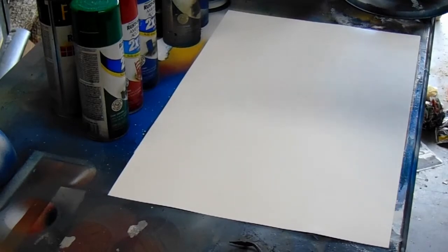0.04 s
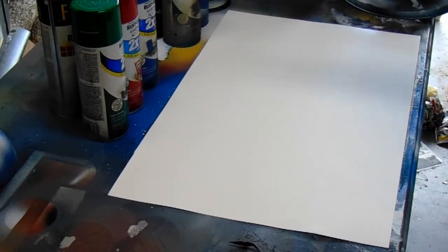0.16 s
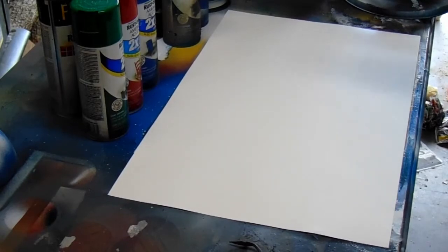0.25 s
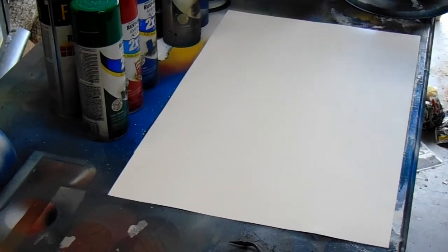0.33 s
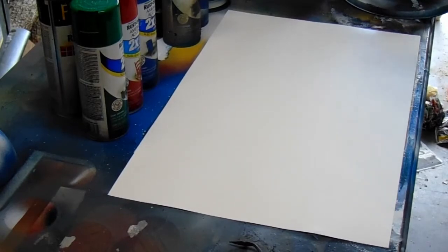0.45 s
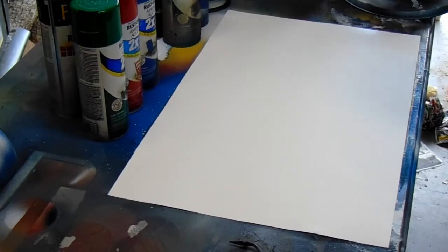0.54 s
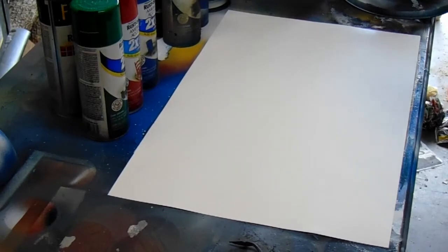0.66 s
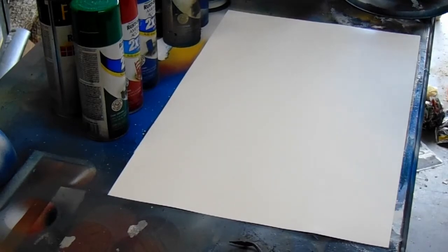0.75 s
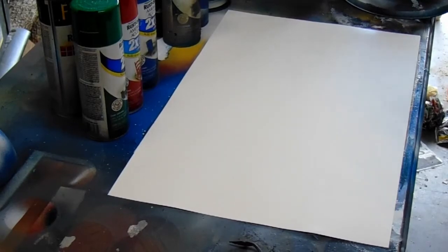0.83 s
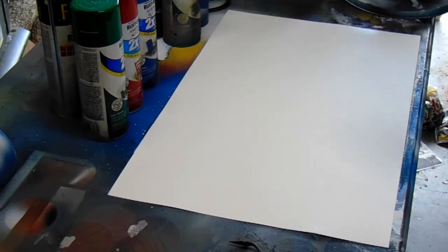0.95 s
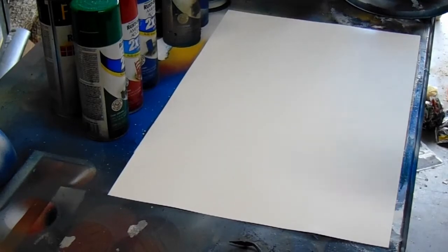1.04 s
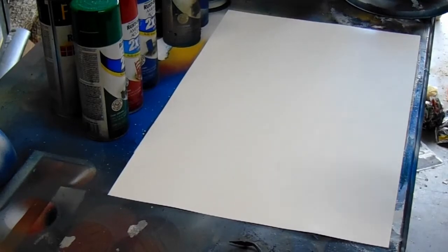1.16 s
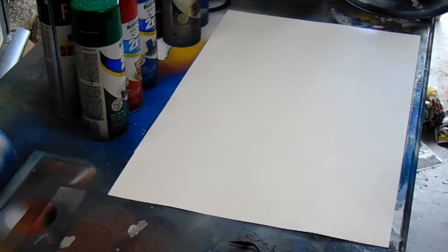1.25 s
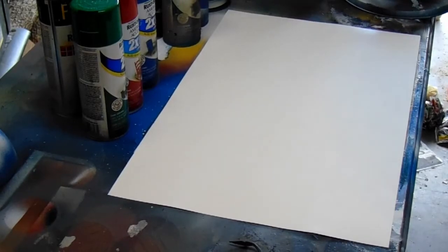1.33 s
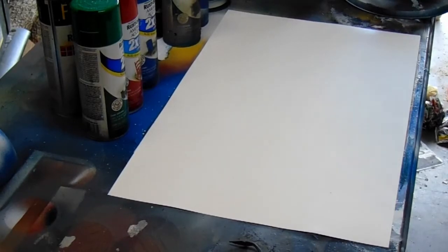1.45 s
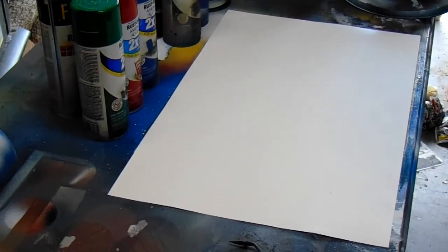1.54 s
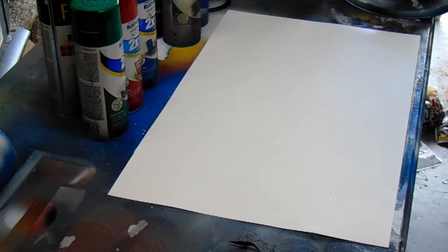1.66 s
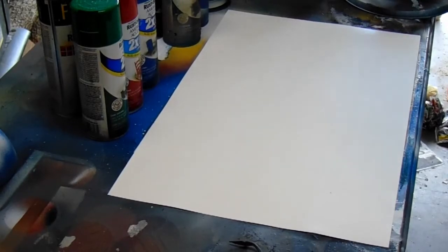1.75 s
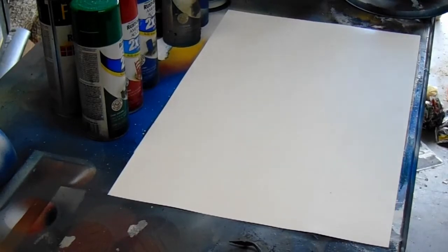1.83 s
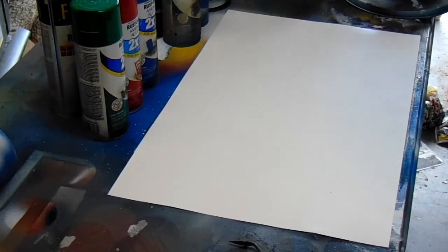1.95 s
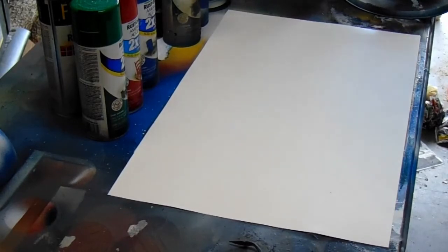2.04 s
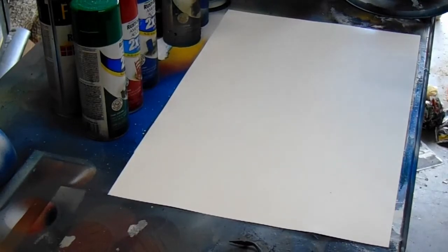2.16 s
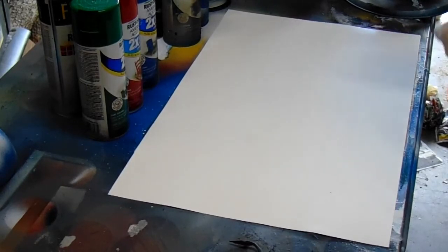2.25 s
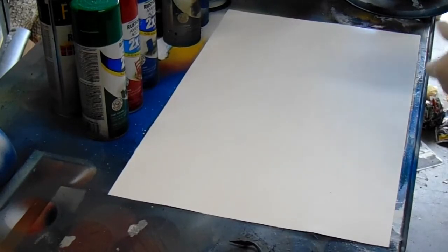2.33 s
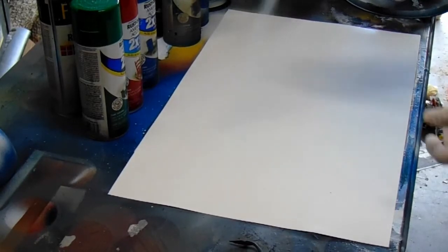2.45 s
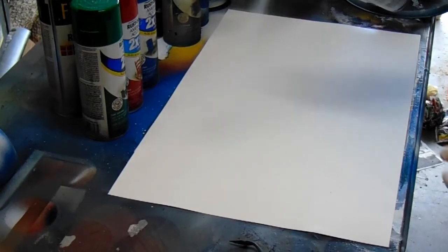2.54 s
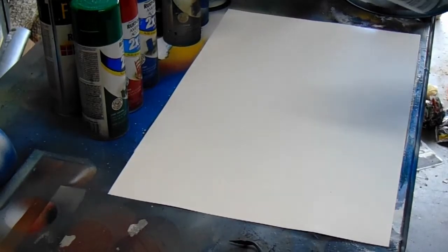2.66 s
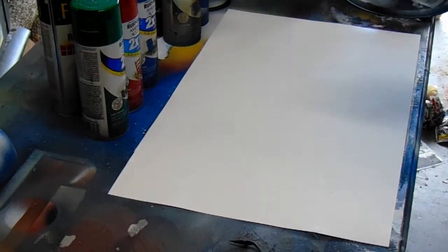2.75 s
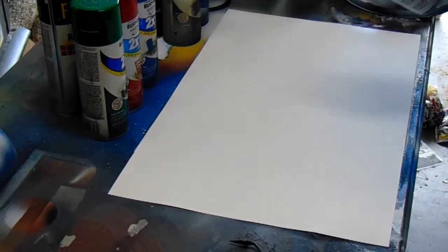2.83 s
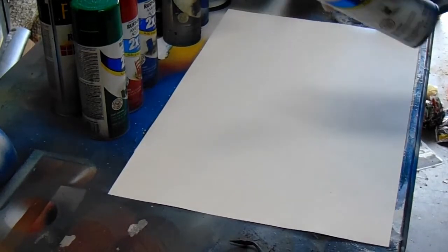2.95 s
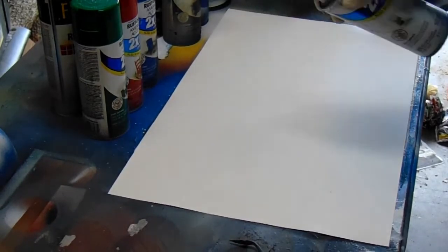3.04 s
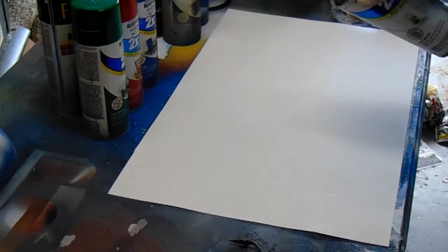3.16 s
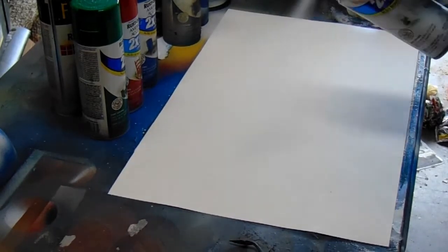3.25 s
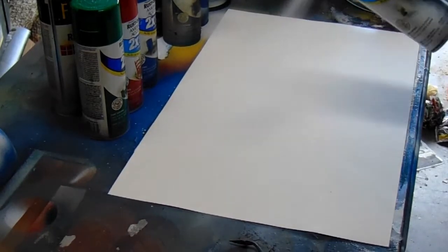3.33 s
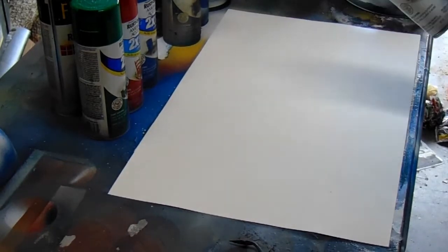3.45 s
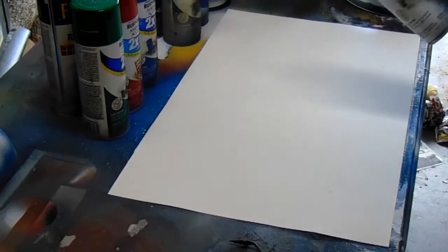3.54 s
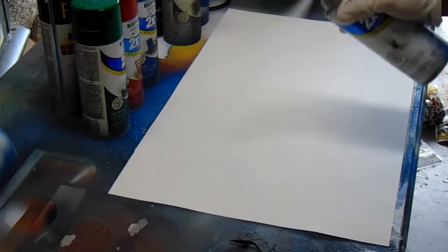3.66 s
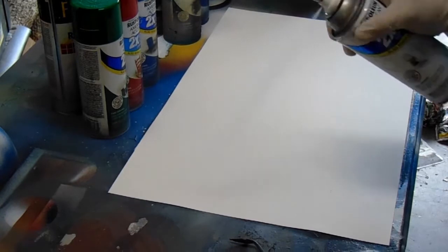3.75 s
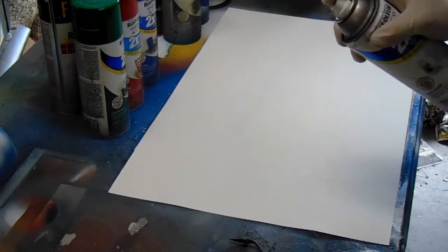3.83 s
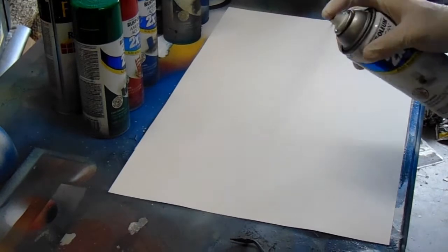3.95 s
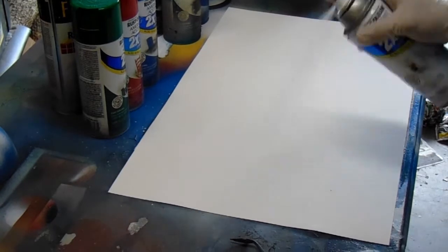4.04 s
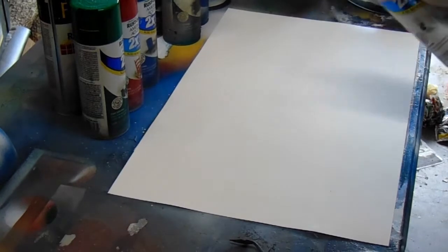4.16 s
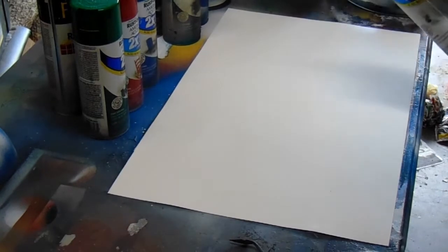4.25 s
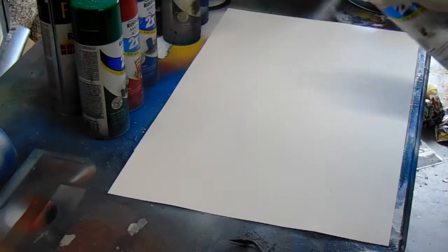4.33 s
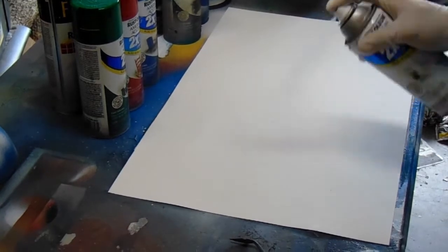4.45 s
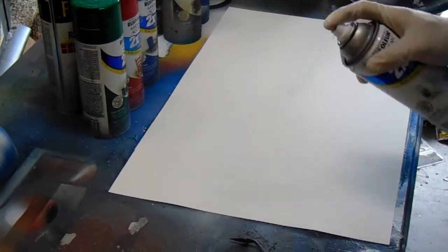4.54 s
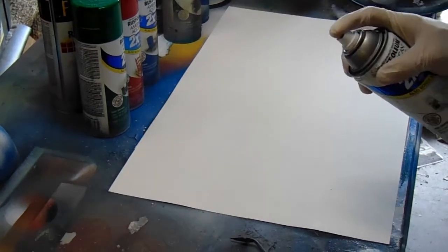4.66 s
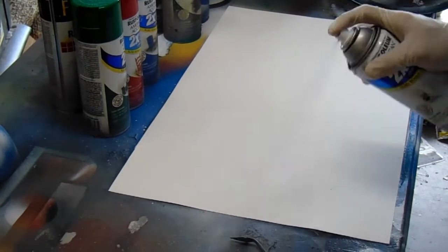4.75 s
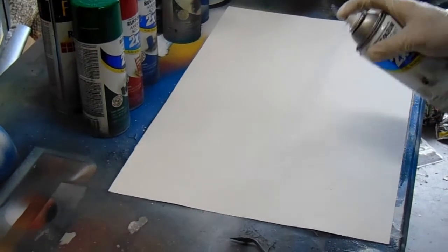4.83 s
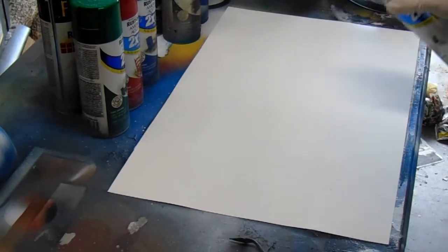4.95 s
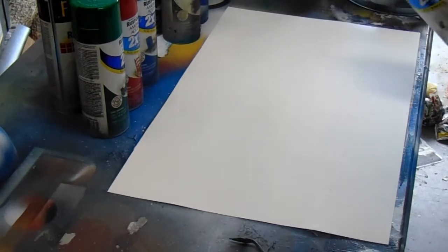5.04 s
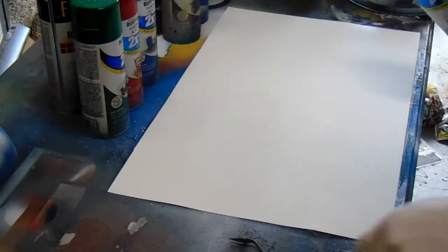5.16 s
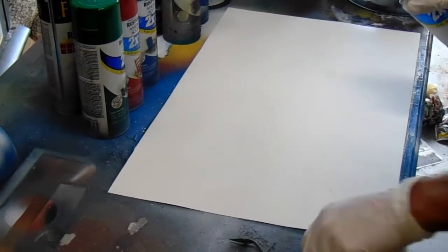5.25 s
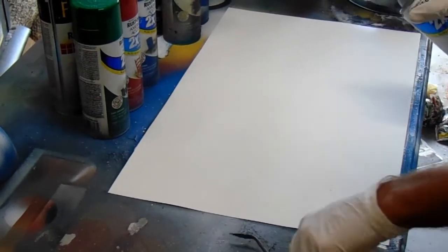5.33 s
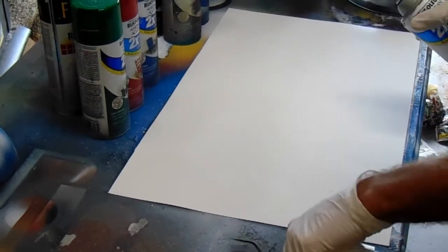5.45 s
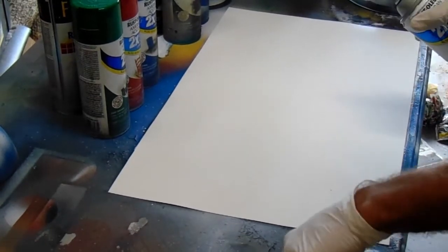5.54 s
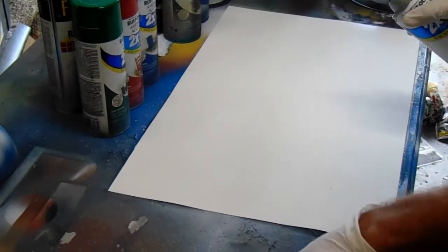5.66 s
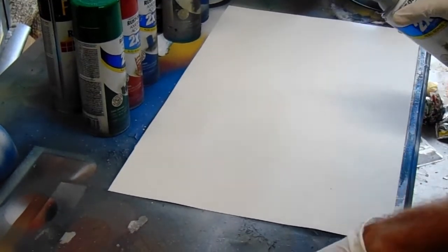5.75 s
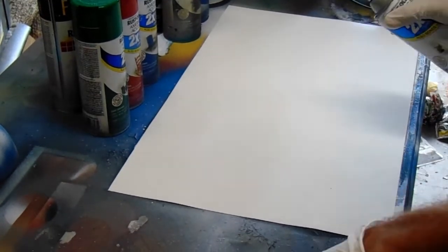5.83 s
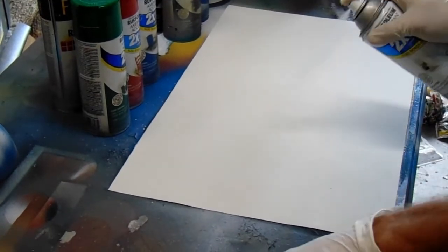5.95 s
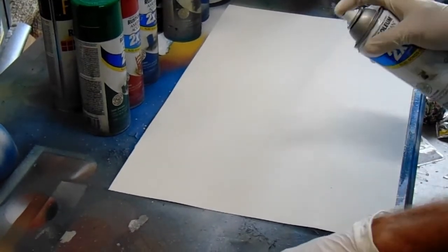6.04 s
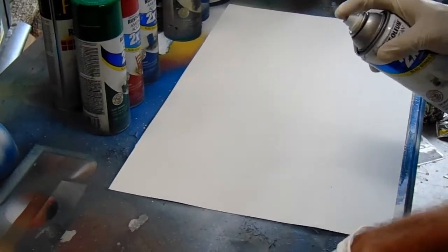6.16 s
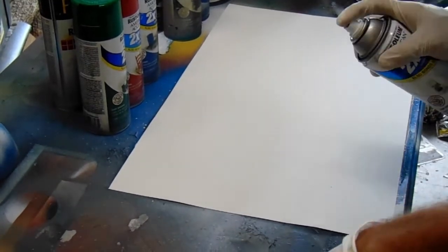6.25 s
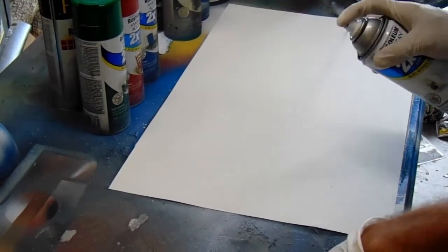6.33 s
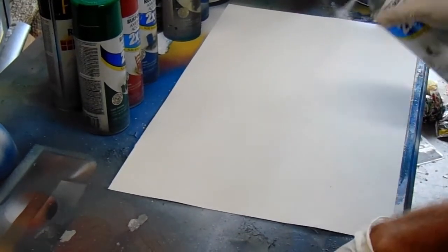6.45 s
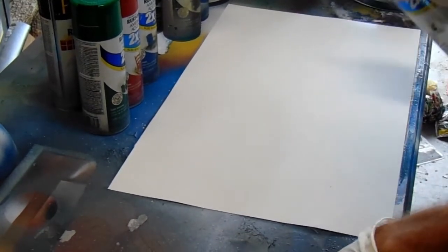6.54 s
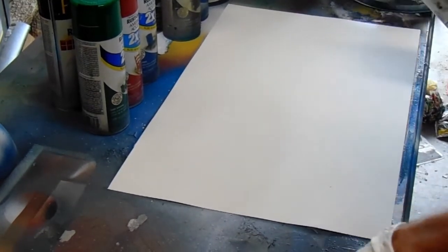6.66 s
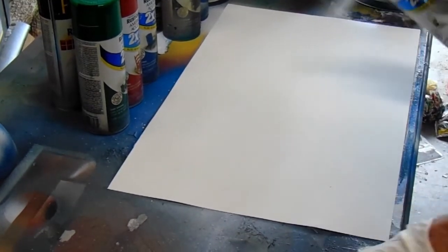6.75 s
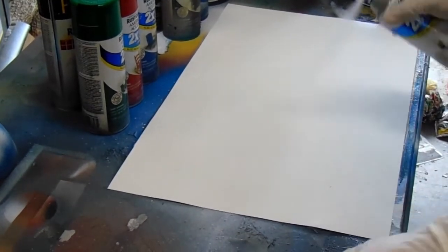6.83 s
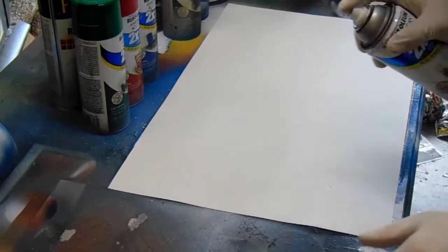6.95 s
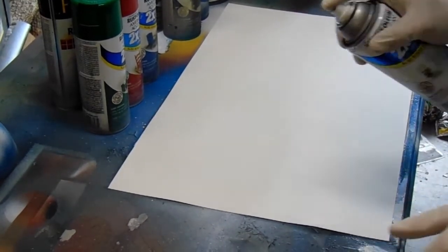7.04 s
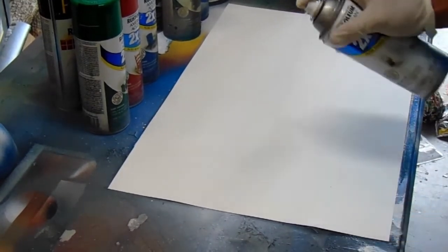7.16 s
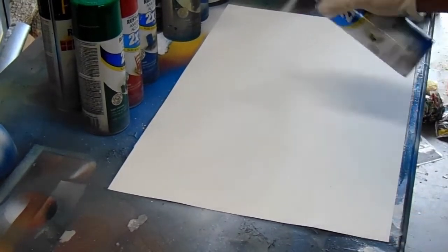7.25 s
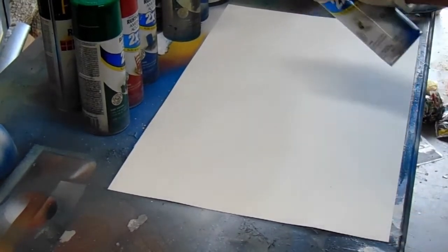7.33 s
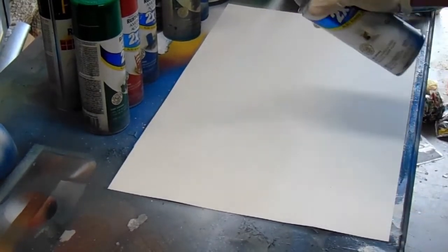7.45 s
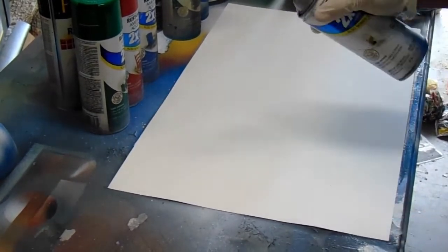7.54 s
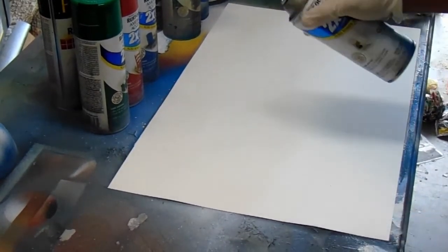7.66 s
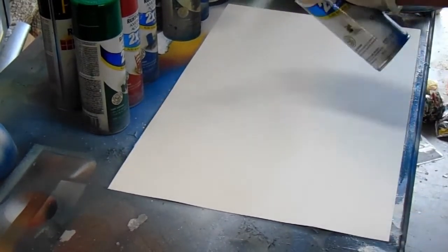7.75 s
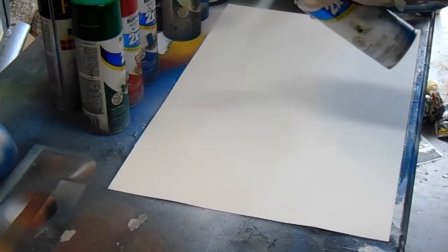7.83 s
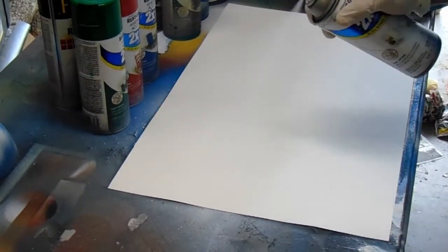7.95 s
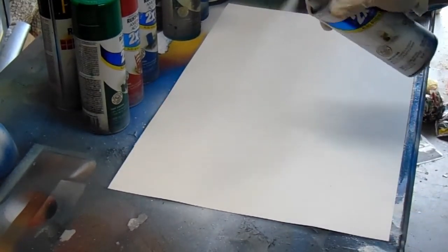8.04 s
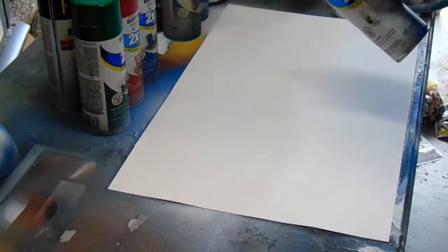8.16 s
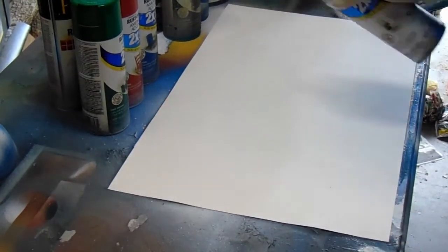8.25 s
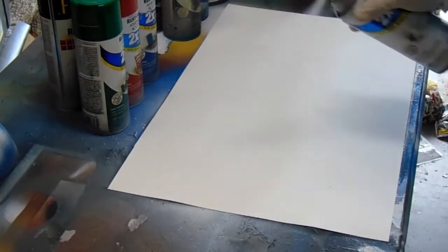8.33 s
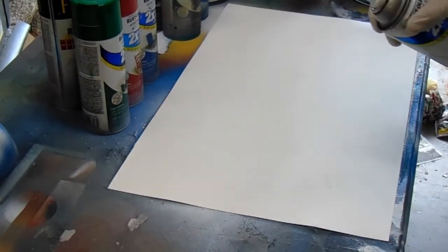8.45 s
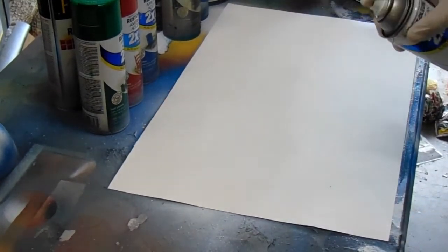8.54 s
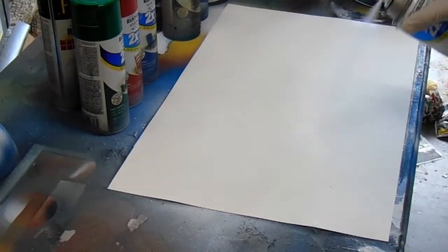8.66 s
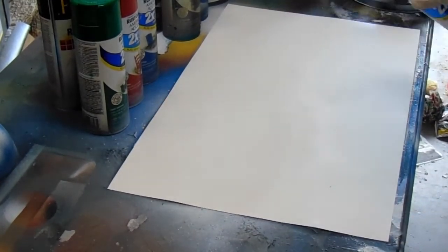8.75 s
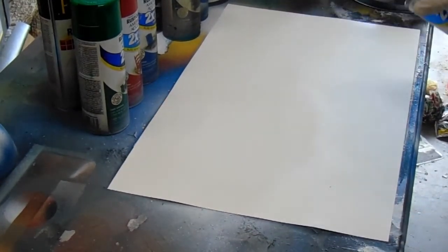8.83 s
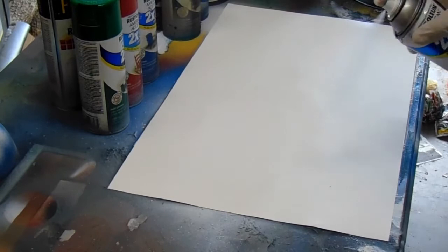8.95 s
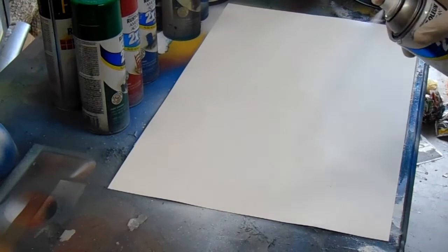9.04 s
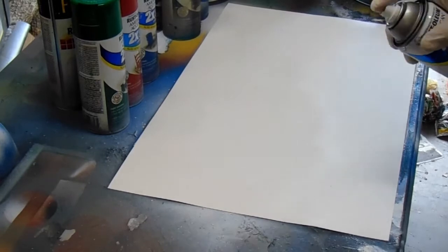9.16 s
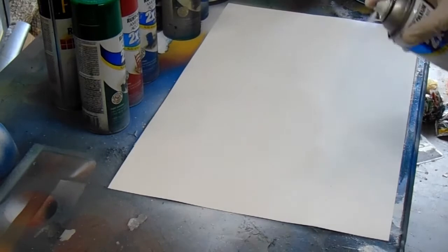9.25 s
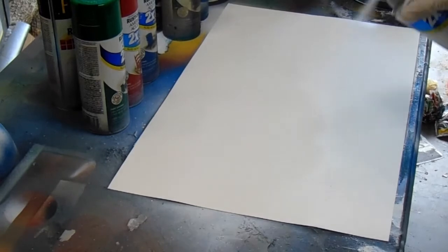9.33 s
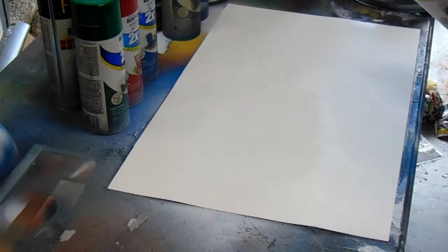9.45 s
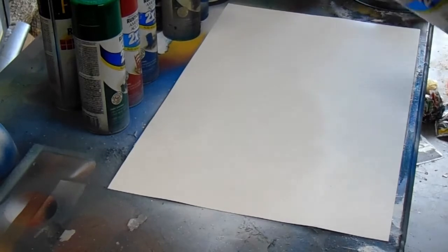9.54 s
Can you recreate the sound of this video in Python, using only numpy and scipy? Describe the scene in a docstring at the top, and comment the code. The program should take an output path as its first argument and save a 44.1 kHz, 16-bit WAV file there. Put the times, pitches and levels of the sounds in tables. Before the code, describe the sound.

A small, lively workshop room with faint hiss and barely audible hum. In the first 0.5 s light, hard things clatter softly off to the side; from 0.8 to 1.2 s there are fainter clicks and a hollow double knock at 1.0, then a dull set-down and short scrape at 1.6. A tiny valve leak at 2.4 leads into close, bright, high-pitched spray bursts, each about 0.2 s long, seven of them from 2.5 to 5.0 s, with light scratching near 2.6. Between 5.4 and 6.0 a tin rings and bounces rapidly, the can's mixing ball clicks sharply, and something thumps and drags with a low, gritty rumble. Spraying resumes at 6.0, with smaller scrapes and knocks until 6.8. Crisp bursts then continue about every 0.3 s, slightly louder, with occasional faint ball clicks and a tiny valve whistle near 8.0, ending around 9.5 s.

```python
"""A spray can at a workshop table, close to the microphone: after a faint leak, eighteen bursts of jet noise.
Its mixing ball clicks by impact on the resonant wall, and its half-pressed valve whistles by filtered noise.
Out of sight, light things clatter and others are set down: struck bodies ring as sums of damped modes.
Midway a hand knocks a tin and drags something over the table, which rumbles and scratches by stick-slip.
A small live room answers with decaying noise, over a faint hum and hiss."""
import sys
import numpy as np
from scipy import signal
from scipy.fft import rfft, irfft, next_fast_len
from scipy.io import wavfile
from scipy.ndimage import map_coordinates

SR = 44100
rng = np.random.default_rng(int(sys.argv[2]) if len(sys.argv) > 2 else 0)


def bounce(signal):
    """Save signal as a 16-bit WAV file at the path given by the first command-line argument."""
    frames = np.transpose(np.atleast_2d(signal))
    limited = np.clip(frames, -1, 1)
    pcm = np.round(limited * 32767).astype(np.int16)
    wavfile.write(sys.argv[1], SR, pcm)


N = 423360

# soft hiss of the quiet room: frequency_hz, relative_density_db
AIR_SPECTRUM = [(12, -39), (20, -12), (119, -4), (148, -11), (236, -10), (468, -13), (551, -14.5),
                (706, -15), (954, -16), (1610, -17.5), (2060, -19.5), (4550, -19.5), (8090, -23),
                (9800, -22), (14000, -29.5)]
# course of the room hiss: time_s, level_db
AIR_LEVEL = [(0, -53.5), (.7, -56), (1.5, -53), (2.3, -51.5), (9.6, -48.5)]
# electric hum: frequency_hz, mean_level_db (rms)
HUM_TONES = [(58, -66.5), (120, -61)]
# reverberation of the room: frequency_hz, t60_s
ROOM_DECAY = [(150, 0.23), (600, 0.35), (2500, 0.3), (6000, 0.3), (13000, 0.21)]
# clatter of light things, first contacts: start_s, level_db, ring_hz
CLATTER_HITS = [(.001, -45, 4000), (.031, -40, 3460), (.044, -31.5, 3120), (.069, -40, 5500),
                (.084, -34, 3420), (.146, -42.5, 1530), (.182, -29, 4600), (.289, -40, 5000),
                (.303, -33, 4330), (.441, -48, 1970), (.8, -47, 1920), (0.845, -43.5, 3430),
                (0.917, -48, 3360), (1.002, -43, 2100), (1.138, -43.5, 1800), (1.149, -42.5, 2870),
                (1.2, -43.5, 3400), (6.322, -43.5, 4800)]
# body of light, hard things: frequency_hz, relative_density_db
PLASTIC_BODY = [(240, -76), (400, -31), (485, -22), (589, -21), (962, -3), (1640, -3.5), (2350, 3),
                (2610, -3), (3560, 1.5), (6560, -5), (9650, -11.5), (14000, -11.5)]
# blows on the table: start_s, level_db, ring_hz (hollow thing that lands), ring_db (relative to level_db)
KNOCKS = [(1.012, -26, 600, 3.5), (1.023, -26, 970, 2), (1.615, -27, 677, -4), (5.428, -46, 467, 1),
          (5.504, -30.5, 725, -8), (5.703, -32, 326, -9), (5.808, -29, 318, -7), (6.292, -40.5, 270, 2),
          (6.323, -39, 716, 3), (6.742, -46.5, 485, 10)]
# body of the table top: frequency_hz, relative_density_db
TABLE_BODY = [(60, -46), (120, -18), (200, -10.5), (310, -2.5), (450, -5), (620, -1.5), (820, -3),
              (1150, -9), (1900, -12), (3000, -19), (5000, -22.5), (8000, -31), (14000, -37)]
# pushes over the table: start_s, length_s, rumble_db, scratch_db
SLIDES = [(1.641, 0.085, -53.5, -45), (2.418, .2, -63.5, -53.5), (2.607, .13, -60.5, -38),
          (5.384, 0.065, -46.5, -53), (5.597, 0.273, -37.5, -43), (5.643, 0.075, -34.5, -33.5),
          (5.793, 0.049, -34.5, -39), (5.943, .115, -49.5, -55), (6.283, 0.069, -40.5, -53),
          (6.346, 0.25, -46, -44), (6.465, 0.031, -34, -37), (6.705, .055, -41, -63)]
# low rumble of rubbing: frequency_hz, relative_density_db
RUB_SPECTRUM = [(88, -49), (150, -35), (215, -24), (301, -1.5), (424, -6), (592, -9), (666, -5),
                (956, -17.5), (1300, -15), (1690, -29), (2860, -120)]
# scratching grains: frequency_hz, relative_density_db
SCRATCH_SPECTRUM = [(530, -20), (900, -5), (1010, -4.5), (2110, -0.5), (2560, 0.5), (4540, -5.5),
                    (4980, -3.5), (6870, -12.5), (14000, -18.5)]
# mixing ball against the can wall: start_s, level_db, treble_tilt_db (per factor e of frequency)
BALL_HITS = [(1.847, -49, 18.5), (2.473, -42, 12), (4.178, -38, -3), (4.386, -38.5, 7), (5.595, -22.5, 1),
             (5.652, -24, -5.5), (5.751, -34.5, -3), (5.802, -31, 11.5), (6.003, -28, -3), (6.578, -38, 3),
             (6.721, -36.5, -10), (8.026, -36.5, 5.5)]
# modes of the can wall: frequency_hz, width_hz, relative_level_db
CAN_MODES = [(1500, 210, -12), (2560, 310, 3), (2940, 110, 2.5), (3330, 300, -0.5), (4200, 650, -4.5),
             (5000, 210, 0), (5720, 350, -10), (6960, 650, -10.5), (9400, 1500, -15.5),
             (12500, 2300, -17.5)]
# presses of the nozzle, the first a mere leak: start_s, stop_s, level_db, fall_db (as the can swings)
BURSTS = [(2.386, 2.516, -49.5, -8), (2.524, 2.698, -25, 0.5), (2.918, 3.078, -23, 1.5),
          (3.31, 3.49, -26.5, 3), (3.68, 3.869, -25.5, 2), (4.043, 4.243, -25.5, 2),
          (4.423, 4.637, -25.5, .5), (4.799, 5, -25, 2), (6.018, 6.198, -24.5, 0), (6.387, 6.572, -24, 4.5),
          (6.828, 7.022, -23.5, -0.5), (7.173, 7.369, -22, 5), (7.5, 7.666, -22, 2.5),
          (7.774, 7.95, -23, 3.5), (8.047, 8.212, -22, 4.5), (8.362, 8.548, -22.8, 1),
          (8.661, 8.858, -24, 3), (8.992, 9.177, -23, 1), (9.309, 9.505, -23, 4)]
# turbulent jet: frequency_hz, relative_density_db
JET_SPECTRUM = [(150, -50), (600, -35), (1100, -30), (1600, -25), (2200, -23), (3100, -21.5), (3700, -17),
                (5000, -14.5), (6200, -10), (7600, -5.7), (8700, -6.7), (10500, -3), (12500, .5),
                (14200, 1.4)]
# hollow of the cap: frequency_hz, width_hz, relative_level_db
CAP_MODES = [(2540, 450, 0)]
# whistles of the half-pressed valve: start_s, stop_s, pitch_hz, level_db
WHISTLES = [(2.464, 2.509, 1640, -44), (4.383, 4.428, 3600, -45), (8.038, 8.063, 3650, -43)]
# modes of the tin: frequency_hz, width_hz, relative_level_db
TIN_MODES = [(1520, 100, -14), (1770, 90, -3), (1930, 130, -3), (2180, 140, -2), (2600, 140, -6.5),
             (3700, 200, -11.5), (4250, 150, -7.5), (5960, 130, -15), (10500, 250, -25)]

TOP_HZ = 14170  # upper band limit
TIME = np.arange(N) / SR
RING_SIZE = 8192  # samples in the transform of one blow
RING_HZ = np.fft.rfftfreq(RING_SIZE, 1 / SR)
BRIGHTEN = 0.32  # a harder blow is brighter: dB of treble tilt per dB of level
CHATTER_S, CHATTER_DB = 0.013, -9  # mean wait for each further contact, and its change in level
SLIDE_ATTACK_S, SLIDE_RELEASE_S = 0.012, 0.013  # every push starts and dies down alike
REBOUND_S, REBOUND_DB = 0.004, -2  # the ball's second contact
OPEN_S, CLOSE_S = 0.02, 0.012  # the valve opens and shuts alike on every press
TIN_S, TIN_DB = 5.505, -24.5  # first contact of the tin
TIN_BOUNCE_S, TIN_LOSS_DB, TIN_DULL_DB = 0.0073, 1.9, 3  # wait between contacts; level and tilt lost at each


def amp(db):
    """Logarithmic level: decibels become amplitude gain."""
    return 10 ** (np.asarray(db) / 20)


def unit(x):
    """Normalisation: a signal is scaled to rms 1."""
    return x / np.sqrt(np.mean(x ** 2) + 1e-20)


def along(points, hz):
    """Logarithmic frequency scale: values are interpolated between points on a log axis."""
    frequency, value = np.transpose(points)
    return np.interp(np.log(hz + 1), np.log(frequency), value)


def tilt(hz, tilt_db, pivot_hz):
    """Spectral tilt: gain leans by tilt_db per factor e about a pivot, within limits."""
    return amp(tilt_db * np.clip(np.log((hz + 1) / pivot_hz), -1, 2))


def wobble(rate):
    """Random modulation: a smooth curve through rate random knots a second."""
    knots = rng.standard_normal(int(N * rate / SR) + 4)
    return map_coordinates(knots, [TIME * rate])


def filtered(x, response):
    """Linear filtering: the spectrum of x is multiplied by a response of frequency."""
    size = next_fast_len(len(x) + 8192)
    spectrum = rfft(x, size) * response(np.fft.rfftfreq(size, 1 / SR))
    return irfft(spectrum, size)[:len(x)]


def noise(spectrum):
    """Coloured noise: white noise is shaped by a spectrum, cut just above TOP_HZ and scaled to rms 1."""
    white = rng.standard_normal(N)
    return unit(filtered(white, lambda hz: amp(along(spectrum, hz)) * (hz < TOP_HZ + 200)))


def resonances(modes, hz):
    """Modal superposition: damped causal resonators add with alternating sign."""
    total = 0
    for k, (centre, width, db) in enumerate(modes):
        damping = 1j * hz * width
        total = total + (-1) ** k * amp(db) * damping / (centre * centre - hz * hz + damping)
    return total


def restruck(modes, scatter_db):
    """Modal excitation: each contact point favours other modes, so their levels scatter."""
    rows = np.array(modes, float)
    return np.c_[rows[:, :2], rows[:, 2] + scatter_db * rng.standard_normal(len(rows))]


def causal(spectrum):
    """Minimum phase: a heavily damped body responds as early as its spectrum allows."""
    cepstrum = irfft(np.log(np.maximum(amp(along(spectrum, RING_HZ)), 1e-6)))
    half = RING_SIZE // 2
    return np.exp(rfft(np.r_[cepstrum[0], 2 * cepstrum[1:half]], RING_SIZE))


def blow(response, contact=0.00032):
    """Impact excitation: a scuff of about contact seconds, with the energy of 10 ms at rms 1."""
    t = np.arange(RING_SIZE) / SR
    force = rfft(rng.standard_normal(RING_SIZE) * np.exp(-t / contact))
    # the scuff spreads the blow in time and leaves the colour to the body
    ring = irfft(response * np.exp(1j * np.angle(force)))[:RING_SIZE // 2]
    return ring / np.linalg.norm(ring) * np.sqrt(SR / 100)


def gate(t, length, attack, release, power=1):
    """Envelope: a rise, a hold until length seconds have passed, then exponential decay."""
    return np.clip(t / attack, 0, 1) ** power * np.exp(-np.maximum(t - length, 0) / release)


def echo(x, wet_db, gap=0.00089):
    """Reverberation: x is convolved with fresh noise that decays at its own rate in each band."""
    hz, t, bands = signal.stft(rng.standard_normal(SR // 3), SR, nperseg=256)
    decay = amp(-60 * t / along(ROOM_DECAY, hz)[:, None])
    tail = signal.istft(bands * decay, SR, nperseg=256)[1]
    # the reflections build up after a short gap
    tail = tail * (1 - np.exp(-(np.arange(len(tail)) / SR / gap) ** 2))
    return signal.fftconvolve(x, amp(wet_db) * tail / np.linalg.norm(tail))


def in_room(x, wet_db):
    """Superposition of direct and reflected sound."""
    answer = echo(x, wet_db)
    return answer + np.pad(x, (0, len(answer) - len(x)))


def add(track, s, x):
    """Superposition in time: x is mixed into the track at time s."""
    i = max(round(s * SR), 0)
    track[i:i + len(x)] += x[:max(N - i, 0)]


def background():
    """Steady sources: coloured noise for the room hiss, gently wavering sines for the electric hum."""
    hum = np.zeros(N)
    for hz, db in HUM_TONES:
        level = amp(db + wobble(3.07)) * np.sqrt(2)
        hum += level * np.sin(2 * np.pi * hz * TIME + 0.37 * wobble(3.22))
    hiss_level = amp(np.interp(TIME, *np.transpose(AIR_LEVEL)))
    return hum + hiss_level * noise(AIR_SPECTRUM)


def clatter(wet_db=2, width_hz=480, contact=0.00071, ring_db=-4, neutral_db=-33, small_db=3, count=3):
    """Repeated impact: light hard things chatter farther off; small things and hard hits are brighter."""
    out, body = np.zeros(N), causal(PLASTIC_BODY)
    for s, db, ring_hz in CLATTER_HITS:
        tilt_db = BRIGHTEN * (db - neutral_db) + small_db * np.log(ring_hz / 3400)
        colour = body * tilt(RING_HZ, tilt_db, 3900)
        for k in range(count):
            ring = amp(ring_db) * blow(resonances([(ring_hz, width_hz, 0)], RING_HZ))
            click = blow(colour, contact)
            add(out, s, in_room(amp(db + k * CHATTER_DB) * (click + ring), wet_db))
            s = s + CHATTER_S * (0.5 + rng.random())
    return out


def knocks(wet_db=0, ring_wet_db=-3, width_hz=55, contact=0.0049, soft_hz=1500, neutral_db=-30):
    """Coupled impact: a blow thumps the table top and rings the hollow thing that lands on it."""
    out, top = np.zeros(N), causal(TABLE_BODY)
    soft = 1 / (1 + 1j * RING_HZ / soft_hz) ** 2  # a blunt contact starts the ring without a click
    for s, db, ring_hz, ring_db in KNOCKS:
        thump = blow(top * tilt(RING_HZ, BRIGHTEN * (db - neutral_db), 560), contact)
        hollow = blow(soft * resonances([(ring_hz, width_hz, 0)], RING_HZ))
        add(out, s, amp(db) * in_room(thump, wet_db))
        add(out, s, amp(db + ring_db) * in_room(hollow, ring_wet_db))
    return out


def slides(judder_db=1.5, grit_db=6, grain_rate=2200, wet_db=-1):
    """Stick-slip friction: dragged things make the table rumble and grains of dry paint scratch."""
    rumble, scratch = np.zeros(N), np.zeros(N)
    for start, length, rumble_db, scratch_db in SLIDES:
        push = gate(TIME - start, length, SLIDE_ATTACK_S, SLIDE_RELEASE_S)
        rumble = np.maximum(rumble, amp(rumble_db) * push)
        scratch = np.maximum(scratch, amp(scratch_db) * push)
    slips = wobble(110)
    struck = rng.random(N) < grain_rate / SR  # grain_rate impulses a second on average
    grains = struck * rng.standard_normal(N) * amp(grit_db * slips / 2)
    low = rumble * unit(noise(RUB_SPECTRUM) * amp(judder_db * slips))
    high = scratch * unit(filtered(grains, lambda hz: amp(along(SCRATCH_SPECTRUM, hz))))
    return in_room(low + high, wet_db)[:N]


def ball(wet_db=-5, scatter_db=2, contact=0.0004):
    """Impact and rebound: the ball excites the modes of the nearby can wall twice in quick succession."""
    out = np.zeros(N)
    for s, db, tilt_db in BALL_HITS:
        for delay, change_db in ((0, 0), (REBOUND_S, REBOUND_DB)):
            wall = resonances(restruck(CAN_MODES, scatter_db), RING_HZ) * tilt(RING_HZ, tilt_db, 3500)
            add(out, s + delay, in_room(amp(db + change_db) * blow(wall, contact), wet_db))
    return out


def flutter():
    """Amplitude modulation: two random curves make the hiss flutter quickly in loudness."""
    return amp(0.5 * wobble(160) + 1.3 * wobble(90))


def spray(wet_db=1, cap_db=-24, spit_db=5, spit_time=0.0066, kick_db=2, count=4):
    """Jet noise: each press releases a turbulent hiss that also blows across the hollow of the cap."""
    out, t = np.zeros(N), np.arange(SR // 3) / SR
    jet = unit(noise(JET_SPECTRUM) * flutter())
    cap = unit(filtered(rng.standard_normal(N), lambda hz: resonances(CAP_MODES, hz)))
    # the first spit of paint is stronger and rings the cap harder
    spit = np.exp(-np.maximum(t - OPEN_S, 0) / spit_time)
    for start, stop, db, fall_db in BURSTS:
        here = np.clip(round(start * SR) + np.arange(len(t)), 0, N - 1)
        progress = np.clip(t / (stop - start), 0, 1)
        valve = gate(t, stop - start, OPEN_S, CLOSE_S, power=1.25)
        pressure = amp(db + fall_db * (0.5 - progress) + kick_db * spit)
        burst = valve * pressure * (jet[here] + amp(cap_db + spit_db * spit) * cap[here])
        add(out, start, burst)
        # the can sweeps through count places, and the room's colour changes with it
        for place in range(count):
            share = np.maximum(1 - abs(progress * (count - 1) - place), 0)
            add(out, start, echo(burst * np.sqrt(share), wet_db))
    return out


def whistles(width=0.38, second_db=-4, third_db=-12, wet_db=0):
    """Narrow-gap flow: gas squeezed through the valve gives a hoarse whistle with two overtones."""
    out, t = np.zeros(N), np.arange(SR // 8) / SR
    for start, stop, pitch_hz, db in WHISTLES:
        def response(hz):
            """Harmonic series: each partial is a squared resonance, its width in proportion to pitch."""
            total = 0
            for k, level_db in enumerate((0, second_db, third_db), 1):
                partial = resonances([(k * pitch_hz, width * pitch_hz, 0)], hz)
                total = total + amp(level_db) * partial ** 2
            return total

        tone = unit(filtered(rng.standard_normal(len(t)), response))
        fade = np.clip((stop - start - t) / 0.01, 0, 1)  # the last 10 ms
        add(out, start, in_room(amp(db) * tone * fade, wet_db))
    return out


def tin(wet_db=-1, crack_db=-12, scatter_db=2, contact=0.001, count=4):
    """Bouncing impact: a nudged tin cracks and rings at each contact, softer and duller than the last."""
    out = np.zeros(N)
    for k in range(count):
        lean = tilt(RING_HZ, -k * TIN_DULL_DB, 2000)
        crack = amp(crack_db) * blow(causal(PLASTIC_BODY) * lean, contact)
        ring = blow(resonances(restruck(TIN_MODES, scatter_db), RING_HZ) * lean)
        contact_sound = amp(TIN_DB - k * TIN_LOSS_DB) * (ring + crack)
        add(out, TIN_S + k * TIN_BOUNCE_S, in_room(contact_sound, wet_db))
    return out


def scene():
    """Superposition: all sources add at one microphone, the same on both channels."""
    mono = background() + clatter() + knocks() + slides() + ball() + spray() + whistles() + tin()
    return np.array([mono, mono])


def record(dry):
    """Band limitation: a very steep low-pass filter removes what lies above TOP_HZ."""
    return np.array([filtered(x, lambda hz: 1 / np.sqrt(1 + (hz / TOP_HZ) ** 500)) for x in dry])


dry = scene()
out = record(dry)
bounce(out)
```